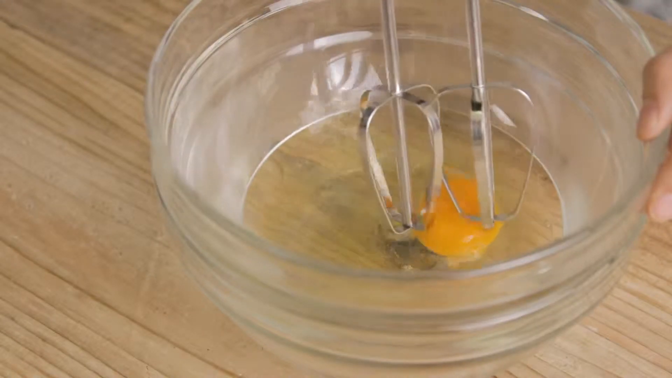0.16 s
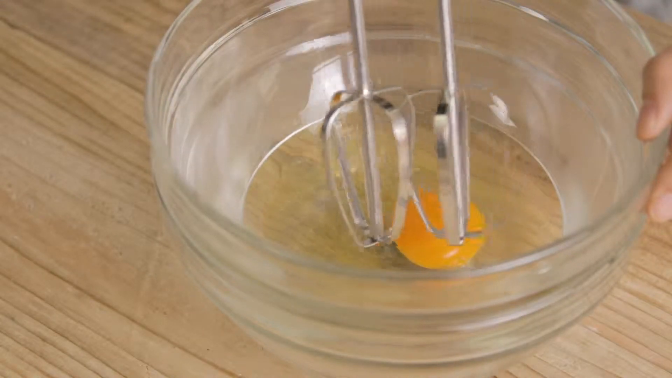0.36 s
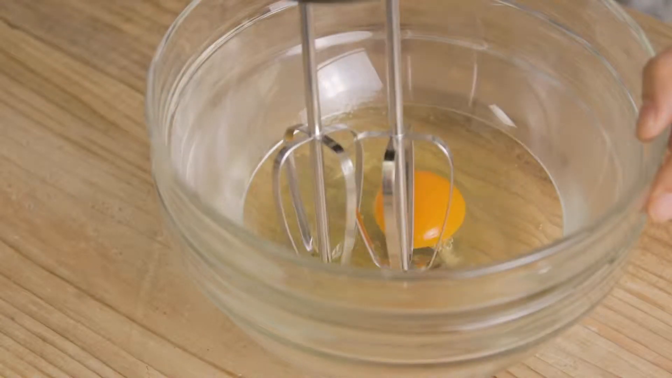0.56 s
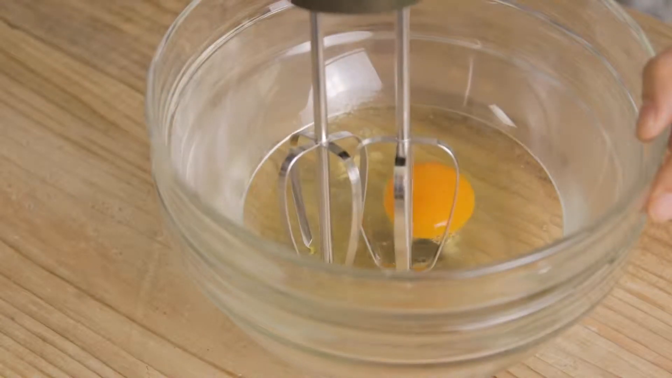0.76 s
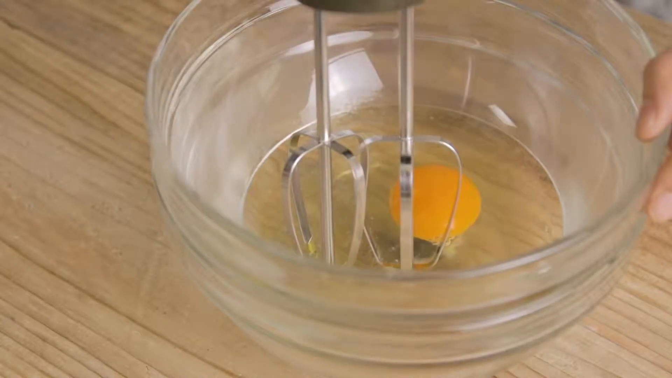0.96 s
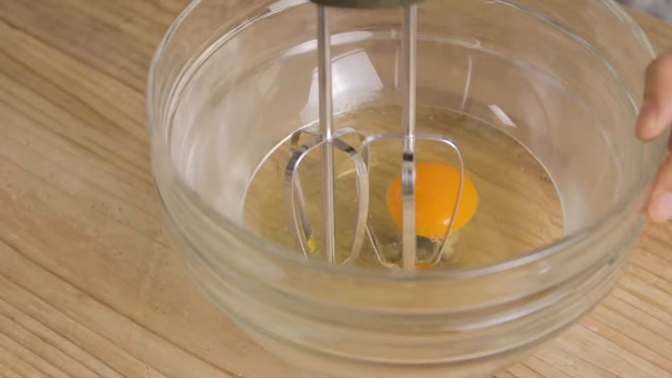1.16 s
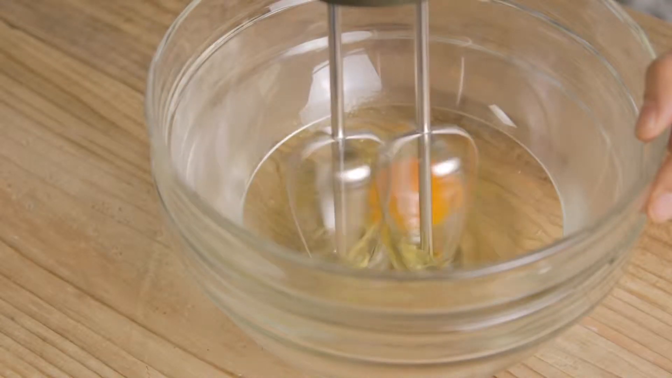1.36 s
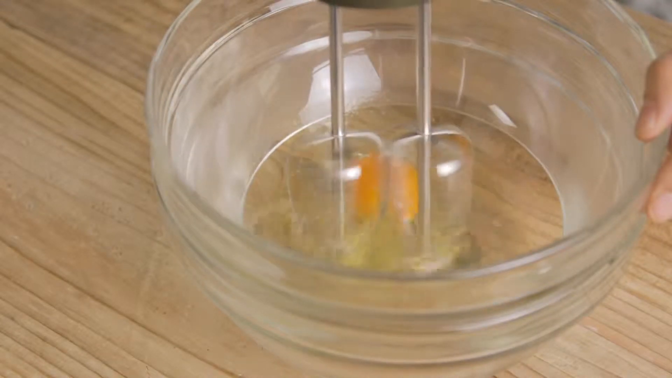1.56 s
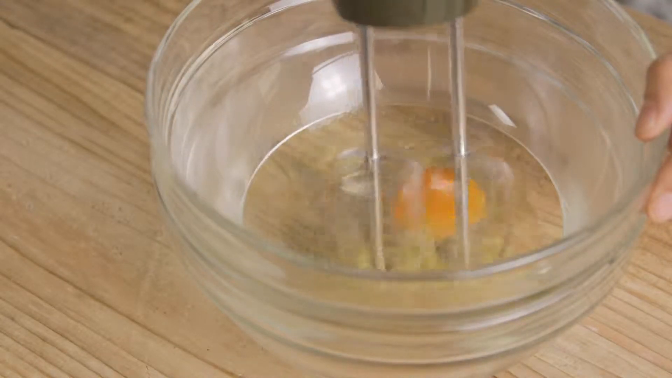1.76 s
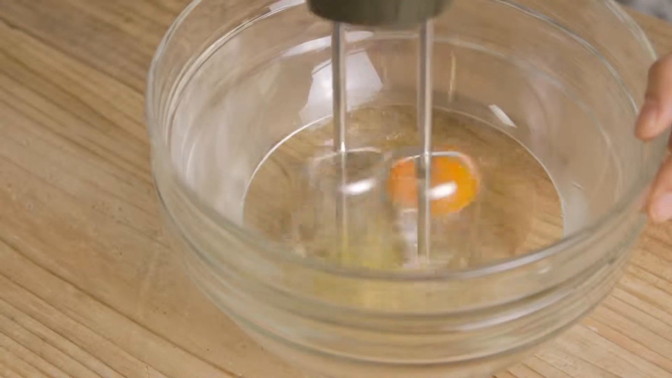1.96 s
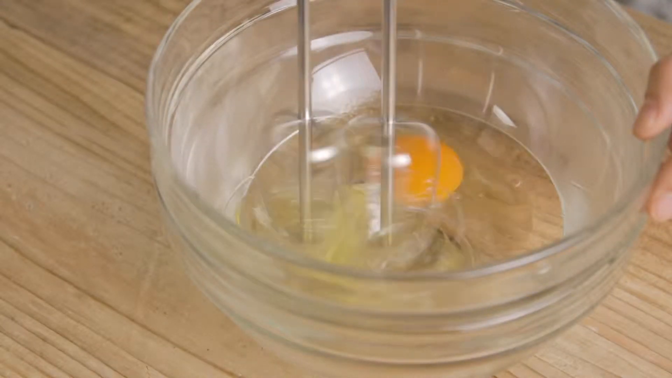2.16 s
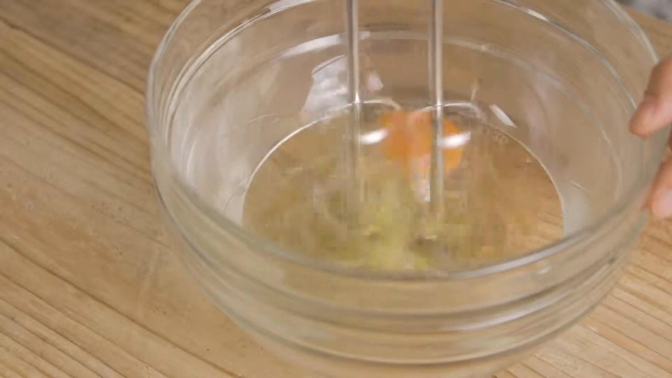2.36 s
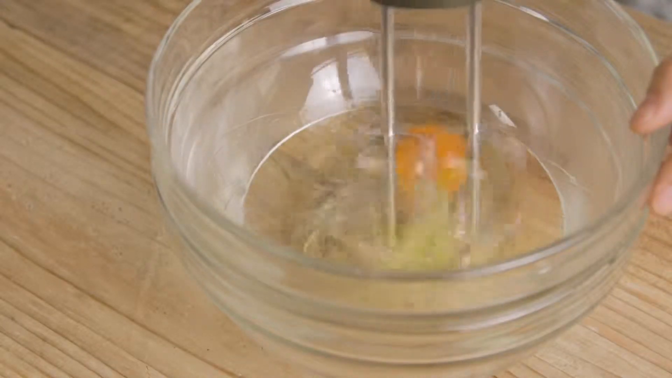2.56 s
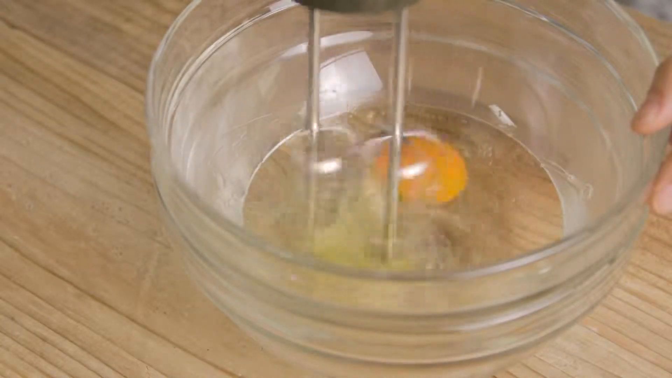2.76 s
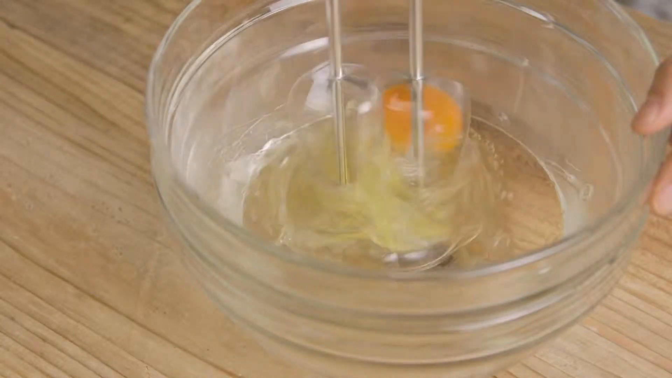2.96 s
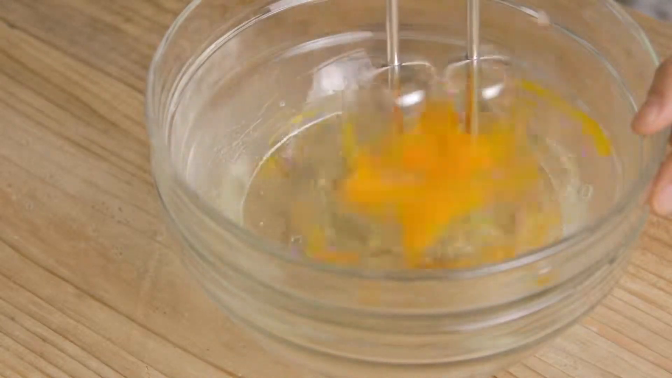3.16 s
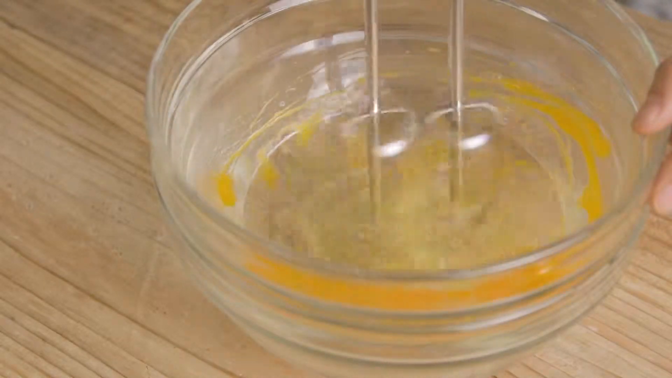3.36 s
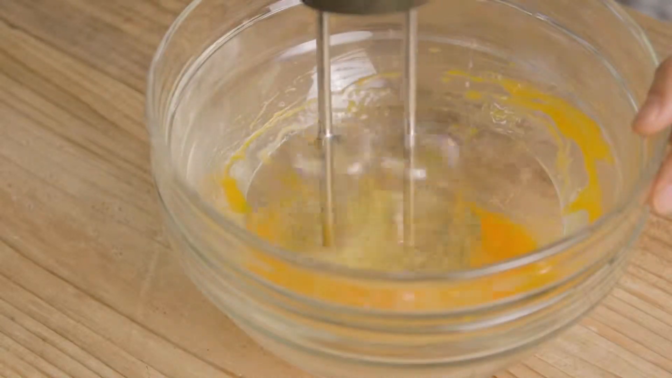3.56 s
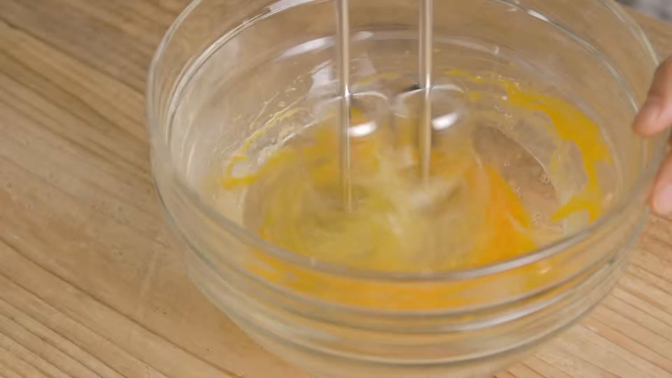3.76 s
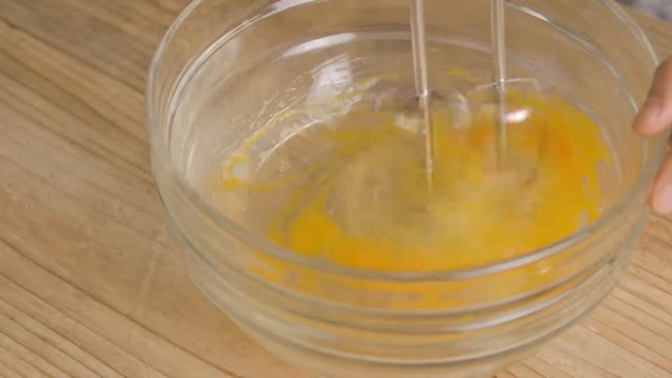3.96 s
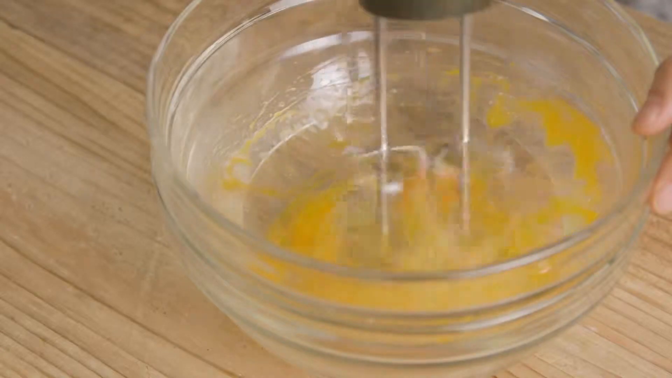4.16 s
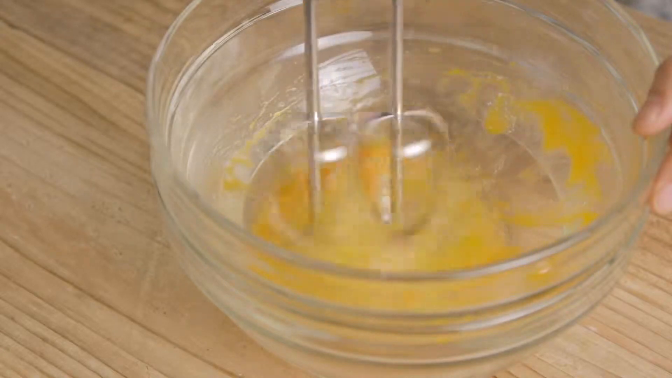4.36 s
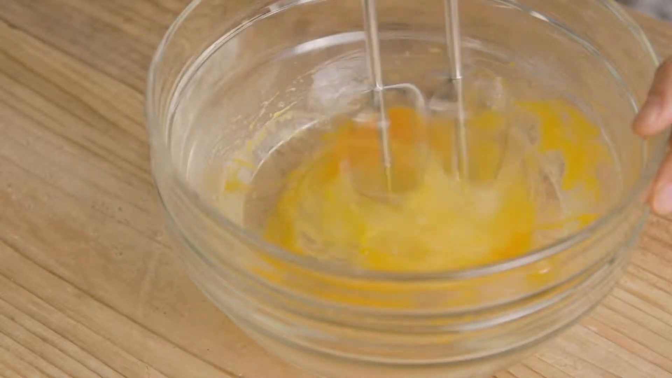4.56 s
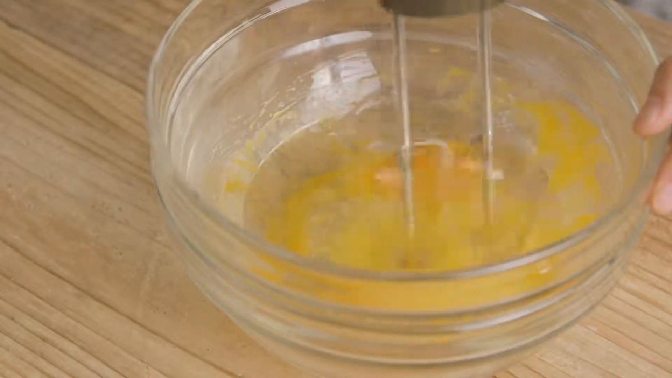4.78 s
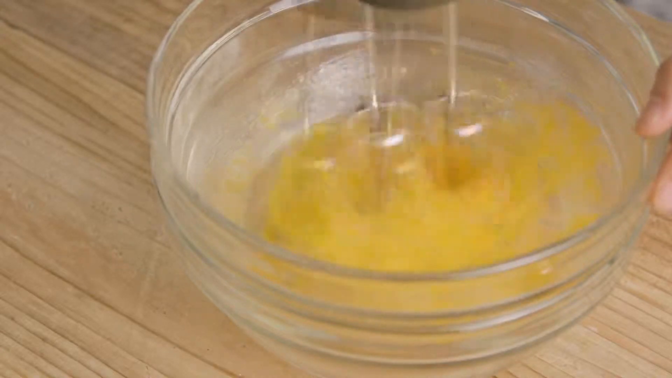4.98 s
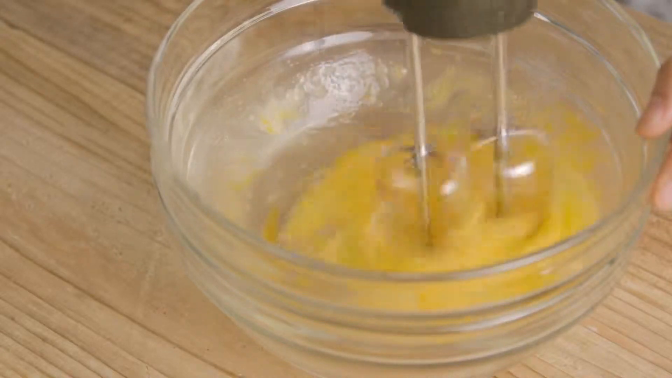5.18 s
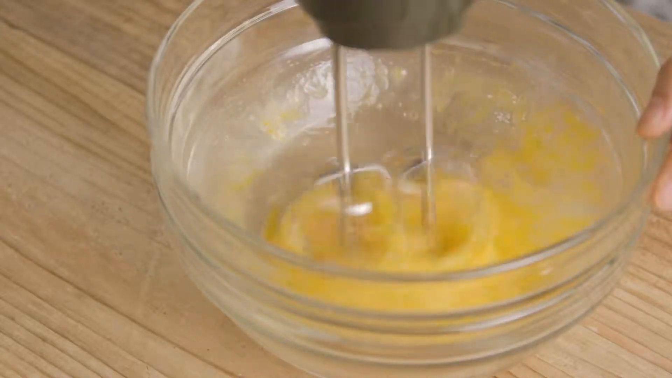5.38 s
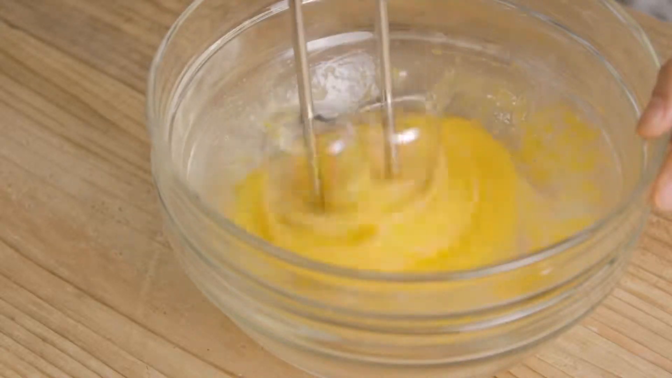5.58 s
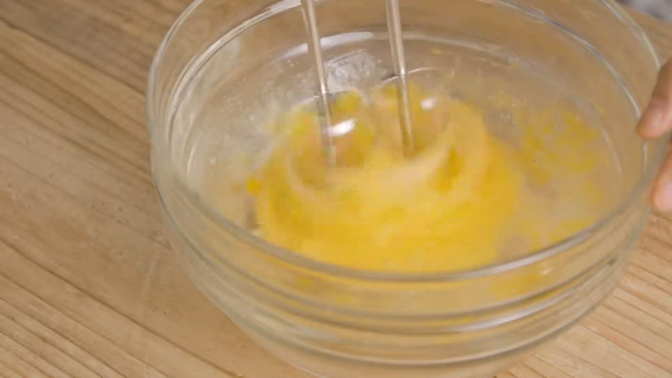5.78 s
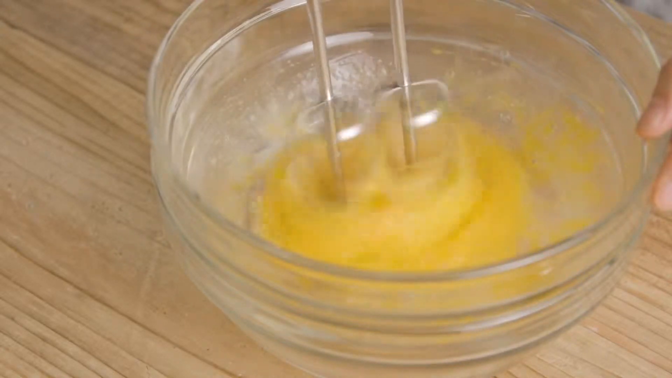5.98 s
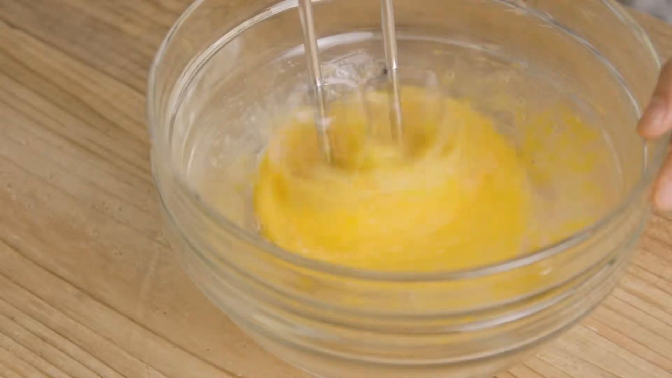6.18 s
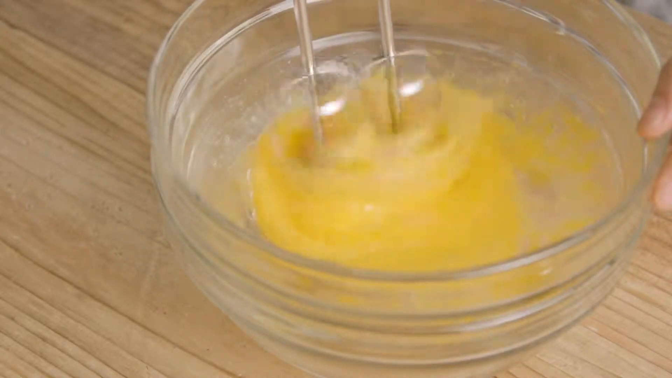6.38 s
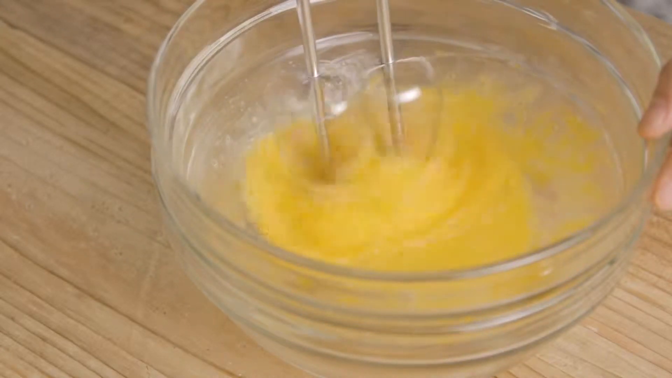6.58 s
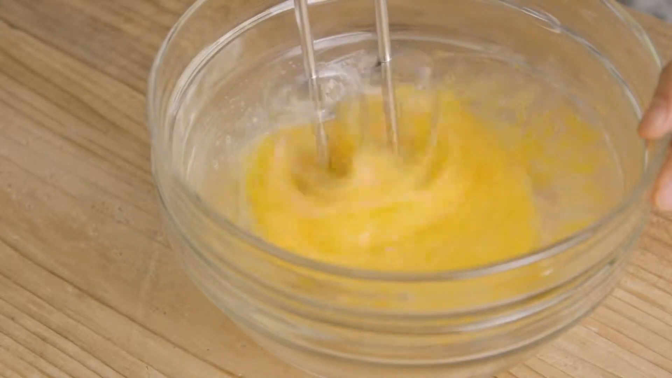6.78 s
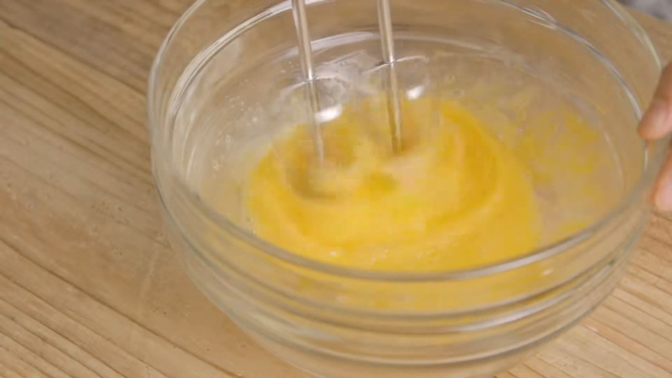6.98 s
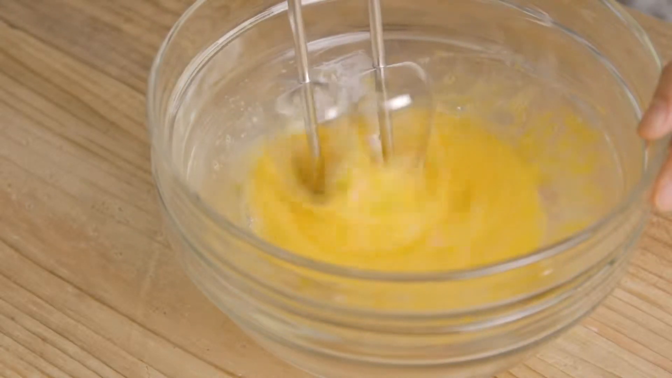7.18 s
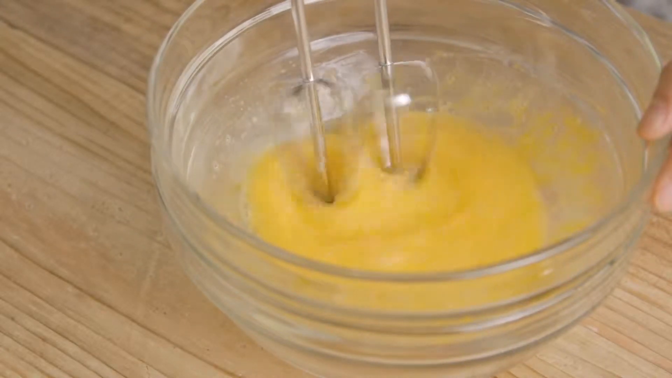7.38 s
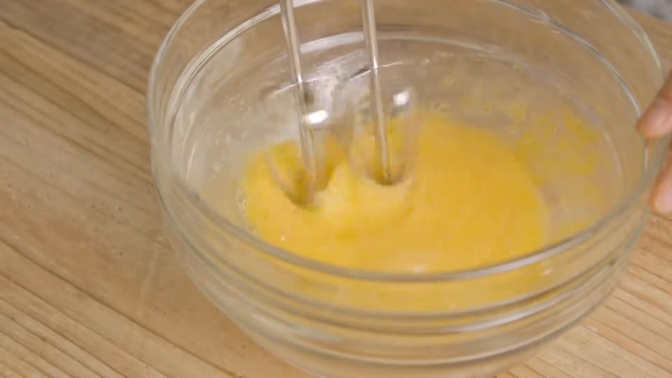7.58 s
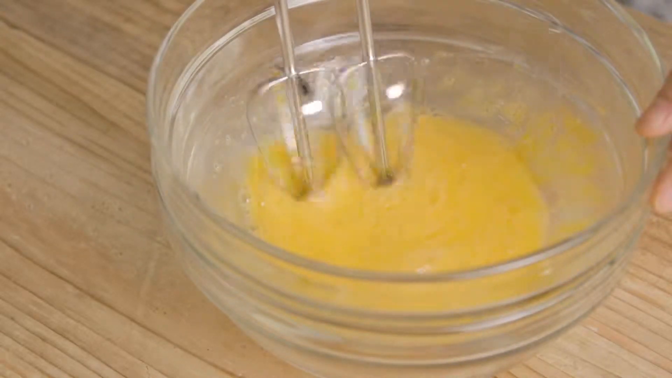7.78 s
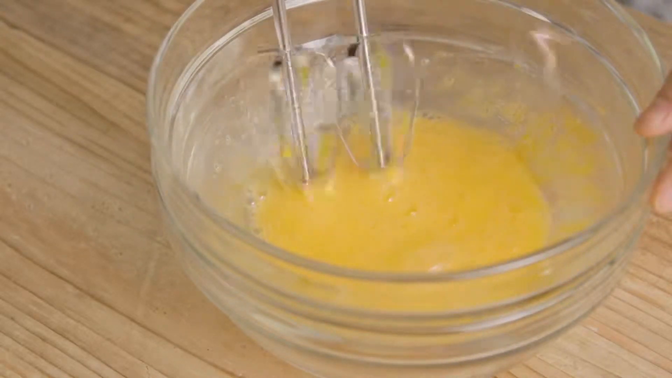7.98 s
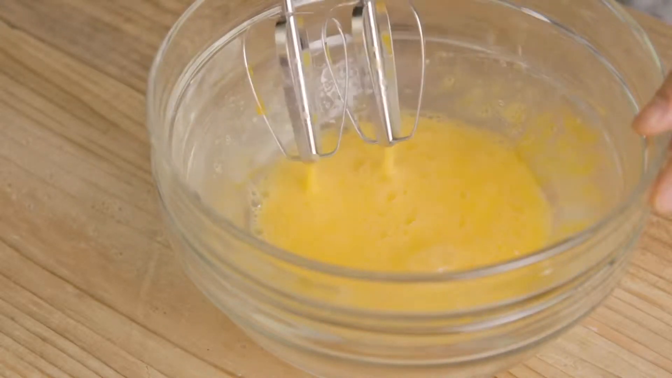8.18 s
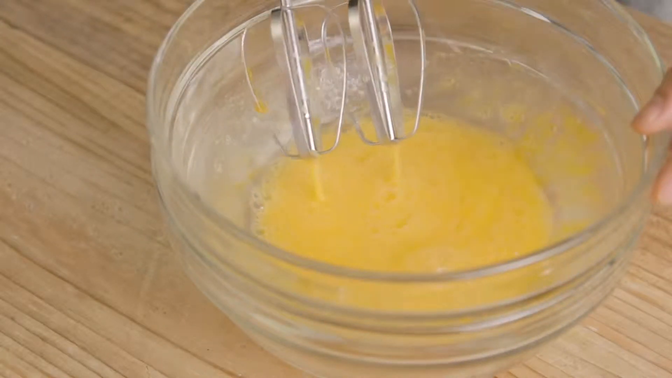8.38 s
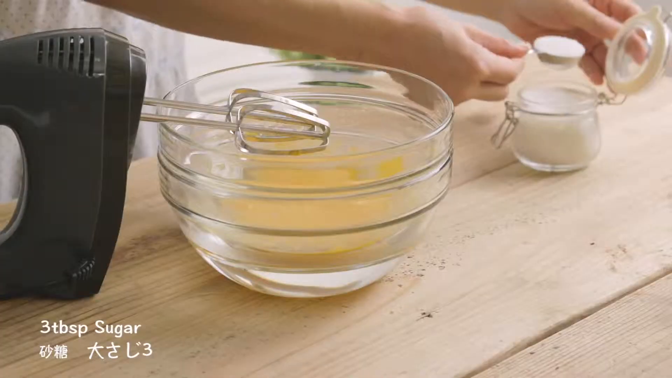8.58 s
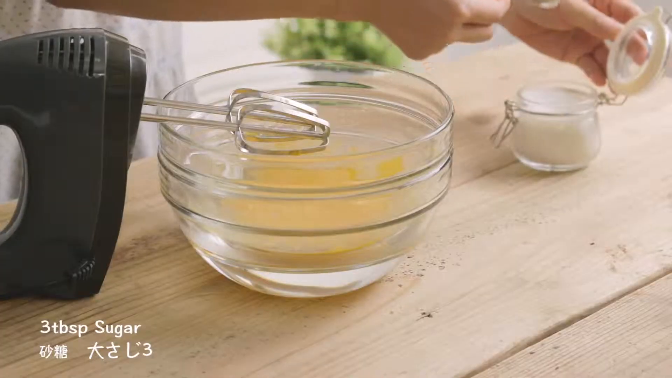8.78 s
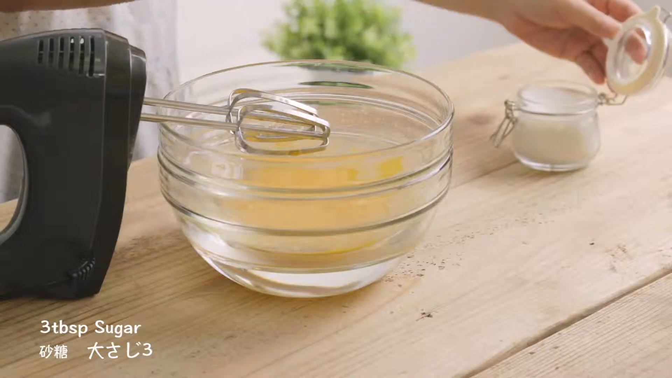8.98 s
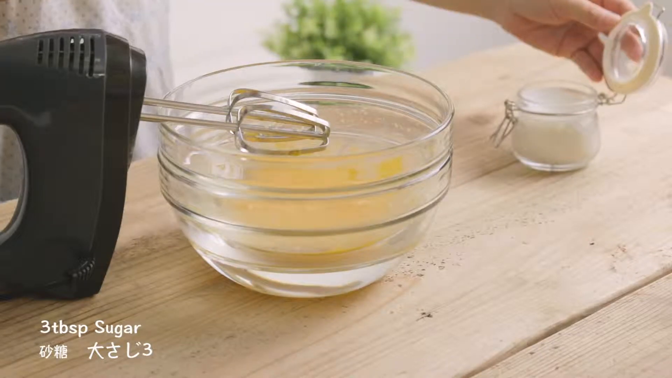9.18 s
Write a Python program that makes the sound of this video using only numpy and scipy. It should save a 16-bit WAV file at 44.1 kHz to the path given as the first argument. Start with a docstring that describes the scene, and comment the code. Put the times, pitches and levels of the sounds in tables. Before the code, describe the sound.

Close up, a hand mixer spins up with a buzzing whine, its steel beaters clinking on glass and whipping eggs, then clatters to a halt.

```python
"""First a faint click and a tap of steel on glass: an electric hand mixer in a bowl of eggs, on a
wooden kitchen table, close to one microphone. The switch snaps and the motor spins up, with fan
whine, commutator buzz and gear rattle in a plastic housing. The wires clink on the bowl and whip in
bubbles; as the eggs thicken, the beaters knock harder, once a turn. Switched off, the mixer clatters
to a stop, and a faint low rumble follows in the room."""
import sys
import numpy as np
from scipy import signal
from scipy.fft import rfft, irfft
from scipy.io import wavfile

SR = 44100
rng = np.random.default_rng(int(sys.argv[2]) if len(sys.argv) > 2 else 0)


def int16_out(signal):
    """Quantize to a 16-bit WAV file."""
    q = np.round(np.clip(np.atleast_2d(signal).T, -1, 1) * 32767)
    wavfile.write(sys.argv[1], SR, q.astype(np.int16))


N = 407484
T = np.arange(N) / SR
ON_S, OFF_S = 1.21, 7.066
FAN_BLADES, COMMUTATOR_SEGMENTS, GEAR_RATIO, MAINS_HZ = 9, 12, 10, 50

# The plastic housing, heard from close by. Each row: frequency in Hz, level in dB.
HOUSING_COLOUR = [(30, -37.5), (100, -28.5), (200, -13.5), (300, -7), (500, -2.5), (1000, -1), (1800, -1),
                  (3000, 2.5), (3800, -4), (5000, -6.5), (7300, -9.5), (10000, -11.5), (12000, -15.5),
                  (15500, -17.5)]
# Its resonances. Each row: centre in Hz, width in Hz, lift in dB.
HOUSING_MODES = [(702, 190, 9.2), (1209, 110, 9.9), (1455, 200, 5.3), (2035, 330, 5.4), (2350, 180, 4.4),
                 (2620, 150, 5.6), (3272, 320, 8.1), (4545, 490, 9.3), (5300, 200, 6.7), (5750, 390, 3.8),
                 (6510, 200, 4.8), (8650, 290, 7.1), (9800, 700, 1.9)]
# Hum of the unbalanced rotor. Each row: multiple of the shaft speed, level in dB.
SHAFT_TONES = [(1, -11), (2, -20), (3, -13.5), (6, -24), (7, -29), (18, -23), (35, -19), (38, -16)]
# That hum as the hand tilts the mixer. Each row: time in seconds, level in dB.
HUM_LEVEL = [(1.2, -4.5), (2.1, -9.5), (2.7, -1.5), (4, -3), (5.2, -2.5), (5.7, -4), (7.1, -9.5)]
# Fan whine as the mixer moves about near the microphone. Each row: time in seconds, level in dB.
WHINE_LEVEL = [(1.8, -44), (2.25, -40.5), (3.5, -44), (4.1, -45), (4.65, -42), (5.2, -47), (6.1, -42),
               (7.05, -43.5)]


def motor(turns, speed, current, drive_db=-30.5, torque_db=-10):
    """Gear teeth, rushing air, rotor and fan all reach the microphone through the housing."""
    pace = speed / speed.max()
    # torque pulses at twice the mains rate, and the gears chafe once a shaft turn
    ripple = 1 + .16 * (T < OFF_S) * np.cos(4 * np.pi * MAINS_HZ * T) + .25 * np.cos(2 * np.pi * turns)
    rattle = undb(-1.5) * impacts(9 * speed, spread_db=3) * ripple * undb(wander(50))
    air = undb(-3) * pace * rng.standard_normal(N)
    hum = sum(undb(db) * shaft_tone(turns, speed, order, flutter_db=2.1) for order, db in SHAFT_TONES)
    hum *= pace ** 6 * undb(curve(HUM_LEVEL) - 1.5)  # unbalance grows steeply with speed
    fan = shaft_tone(turns, speed, FAN_BLADES, flutter_db=1.22, wobble=.0065)
    fan *= undb(curve(WHINE_LEVEL)) * pace ** 2.1
    effort = undb(drive_db) * (pace ** 2.05 + undb(torque_db) * current)
    return through((rattle + air + hum) * effort + fan, body(HOUSING_COLOUR, HOUSING_MODES))


# Spin-up in a quick and a slow stage. Each row: share of the speed, time constant in seconds.
SPIN_UP_STAGES = [(.4, .16), (.6, .37)]
# The speed the motor settles to in the eggs. Each row: time in seconds, turns per second.
LOADED_SPEED = [(2.9, 365.3), (4, 364), (4.85, 365.5), (5.55, 363), (6.8, 367.5), (7.05, 370)]


def rotor(friction_hz_per_s=276, drag_s=6):
    """Shaft speed in turns per second, and the starting current, which dies away as the speed builds."""
    lag = sum(share * np.exp(-np.maximum(T - ON_S, 0) / tau) for share, tau in SPIN_UP_STAGES)
    driven = curve(LOADED_SPEED) * (1 - lag)
    # switched off, the rotor is braked by steady friction and a little air drag
    braked = 1 - np.exp(-np.maximum(T - OFF_S, 0) / drag_s)
    speed = np.maximum(driven - braked * (driven + friction_hz_per_s * drag_s), 0)
    current = lag * ramp(ON_S + .008, rise_s=.018)
    return speed * (1 + .0007 * wander(20)), current


def shaft_tone(turns, speed, order, flutter_db, wobble=.0044):
    """One multiple of the shaft speed; play in the bearings shakes its level and phase."""
    phase = order * (turns + wobble * wander(130))
    flutter = undb(flutter_db * wander(60))
    return np.sqrt(2) * np.sin(2 * np.pi * phase) * flutter * (order * speed < SR / 2)


# Brush whistle. Each row: multiple of the segment rate, level in dB, lift in dB when turning slowly.
COMMUTATOR_TONES = [(1, -13, -5), (2, -15, 5), (3, -3.5, -9), (4, -8, 3), (5, -10, 3), (6, -13, 1),
                    (7, -16, 0)]


def brushes(turns, speed, current, whistle_db=-35, start_lift_db=14, off_db=-8, ticking_db=-37):
    """Brushes whistle on the commutator; at low speed they tick in a comb of gliding overtones."""
    pace = speed / speed.max()
    slow = np.clip(3.5 * (1 - pace), 0, 1)
    level_db = whistle_db + start_lift_db * current + off_db * ramp(OFF_S, rise_s=.04) + 2.2 * wander(5)
    whistle = np.zeros(N)
    for k, db, lift_db in COMMUTATOR_TONES:
        tone = shaft_tone(turns, speed, COMMUTATOR_SEGMENTS * k, flutter_db=2.5, wobble=.006 / k)
        whistle += undb(db + slow * lift_db) * tone
    whistle *= pace ** 2.3 * undb(level_db)
    comb = sum(shaft_tone(turns, speed, COMMUTATOR_SEGMENTS * k, flutter_db=3.5, wobble=.0012)
               for k in range(3, 11))
    ticking = comb * undb(ticking_db) * pace ** 2.5 * (1 - pace) ** 2
    return through(whistle + ticking, body(HOUSING_COLOUR, HOUSING_MODES))


# The steel motor frame. Each row: frequency in Hz, level in dB.
FRAME_COLOUR = [(30, -39), (500, 5.5), (1100, 3.5), (2700, -4), (4000, -15), (7000, -19.5), (15500, -26)]
# Its resonances. Each row: centre in Hz, width in Hz, lift in dB.
FRAME_MODES = [(1204, 210, 17), (2640, 300, 20), (6300, 300, 20)]


def inrush(turns, speed, current, buzz_db=-23, spark_db=-22.5):
    """Starting current makes the brushes buzz and spark; the buzz flares at each frame resonance."""
    pace = speed / speed.max()
    buzz = sum(shaft_tone(turns, speed, COMMUTATOR_SEGMENTS * k, flutter_db=3, wobble=.02 / k)
               for k in (1, 2))
    buzz *= undb(buzz_db) * pace ** 1.5
    mains_pulse = np.sin(2 * np.pi * MAINS_HZ * T) ** 2
    sparks = undb(spark_db) * impacts(3500, spread_db=2) * mains_pulse * (1 - pace) ** 2
    return through((buzz + sparks) * current, body(FRAME_COLOUR, FRAME_MODES))


# The gear case. Each row: frequency in Hz, level in dB.
GEARCASE_COLOUR = [(30, -41), (400, -34), (700, -4), (1200, -7), (2500, -9.5), (4500, -8.5), (7000, -13),
                   (10000, -17), (15500, -19.5)]
# Its resonances. Each row: centre in Hz, width in Hz, lift in dB.
GEARCASE_MODES = [(680, 99, 8), (1192, 150, 12.15), (1470, 190, 6.8), (2070, 320, 16), (4420, 700, 5.5)]


def gears(turns, speed, current, rasp_db=-32.5, jerk_db=-25.5):
    """Slack teeth rasp in their case at low speed, hardest when the starting torque jerks them."""
    pace = speed / speed.max()
    teeth = impacts(45 * speed, spread_db=2) * (1 + .2 * np.cos(2 * np.pi * turns))
    level = undb(rasp_db) * pace ** 1.15 * (1 - pace) + undb(jerk_db) * current ** 3
    return through(teeth * level, body(GEARCASE_COLOUR, GEARCASE_MODES))


# The loose beater shafts. Each row: frequency in Hz, level in dB.
BEATER_COLOUR = [(30, -30.5), (120, -14), (300, -20), (550, -1.5), (1000, -4), (1700, -4.5), (3000, -1),
                 (5000, -9), (6200, -8), (9500, -16.5), (12000, -21), (15500, -26)]
# Their resonances. Each row: centre in Hz, width in Hz, lift in dB.
BEATER_MODES = [(709.6, 194, 16.3), (1311, 140, 17.2), (2160, 98, 7.6), (2820, 110, 7.1), (3400, 300, 4.5),
                (3980, 92, 9.7), (4394, 580, 9.8), (5320, 140, 4.7), (7110, 470, 8), (8350, 200, 13),
                (10480, 570, 16)]
# Their knocking, harder as the eggs thicken. Each row: time in seconds, level in dB.
KNOCK_LEVEL = [(1.3, -29), (2.2, -36), (4.35, -33.5), (4.8, -21.5), (5.05, -33), (5.25, -24), (5.6, -24.5),
               (6.1, -24), (7.1, -23)]


def beaters(turns, speed, chatter_s=.0056, limp_db=3, knock_phase=.66, min_shaft_hz=138):
    """The shafts knock in their sockets once a beater turn, each time a short chatter of steel."""
    pace = speed / speed.max()
    beater_turn = np.floor((turns - np.interp(OFF_S, T, turns)) / GEAR_RATIO - knock_phase)
    starts = np.flatnonzero((np.diff(beater_turn) > 0) & (speed[1:] > min_shaft_hz))
    # coasting freely, the beaters limp: every other knock is harder
    limp = limp_db * ramp(OFF_S, rise_s=.152) * np.cos(np.pi * beater_turn)
    strength = undb(curve(KNOCK_LEVEL) + limp) * pace ** .71
    age = np.arange(SR // 20) / SR / chatter_s
    pulse = age * np.exp((1 - age ** 2) / 2)
    force = np.zeros(N)
    # the drag of the egg makes each knock a little early or late, strong or weak
    for i, (late, size) in zip(starts, rng.standard_normal((len(starts), 2))):
        add(force, T[i] + .001 * late, strength[i] * undb(1.2 * size) * pulse)
    return through(force * impacts(9000, spread_db=1), body(BEATER_COLOUR, BEATER_MODES))


# Wires strike the bowl, close to the microphone.
# Each row: start in seconds, level in dB, treble tilt in dB.
BOWL_STRIKES = [(0.659, -25, -2.5), (1.352, -27, 4), (1.372, -25, 3), (1.427, -22, -8),
                (1.469, -22.5, -10.5), (1.554, -20, -11.5), (1.632, -25, -10.5), (1.857, -18, -2.5),
                (1.948, -25.5, -8), (2.349, -24, 3.5), (2.515, -21, -1), (2.578, -23.5, 4.5),
                (2.707, -22, -4), (3.207, -22, 12), (3.533, -23, -1.5), (3.705, -24.5, -0.5),
                (3.999, -20, 12), (4.027, -19.5, 2.5), (4.364, -23.5, -9), (4.68, -21.5, 4),
                (5.2, -18.5, -1), (6.407, -22.5, 8)]
# Steel scraping on glass. Each row: frequency in Hz, level in dB.
SCRAPE_COLOUR = [(30, -44), (120, -35), (350, -23), (600, -8), (1700, -8), (3000, -4), (5000, -6),
                 (6500, -12), (8300, -5), (11000, -12), (15500, -20)]
# Glass and steel ringing together. Each row: frequency in Hz, level in dB, seconds to fall by 60 dB.
BOWL_MODES = [(598, -6, .11), (743, -12, .09), (1240, -7, .13), (1389, -14, .16), (2266, -17, .17),
              (2756, -2, .24), (2900, -6, .18), (3350, -18, .13), (3800, -12, .19), (4400, -18, .12),
              (4924, -12, .23), (5080, -10, .16), (5900, -19, .18), (6831, -20, .18), (7612, -20, .15),
              (8140, -9, .17), (8400, -8, .09), (9100, -20, .11), (10220, -13, .11), (10700, -17, .11),
              (11400, -22, .08), (15100, -23, .06)]


def bowl(scrape_s=.024, scrape_db=-2, ring_db=-6.5, wet_damping=.41, contact_s=.00094, loops=4):
    """Wire glances off the glass: a brief scrape, then a ring that the whirling egg shortens."""
    out = np.zeros(N)
    contact = body(SCRAPE_COLOUR, [(hz, 160, 9) for hz, _, _ in BOWL_MODES])
    for start, db, treble_db in BOWL_STRIKES:
        damping = wet_damping if start > ON_S else 1
        t, envelope = fade(scrape_s)
        scrape = 4 * np.sqrt(t / scrape_s) * envelope * rng.standard_normal(len(t))
        add(out, start, undb(db + scrape_db) * signal.fftconvolve(scrape, contact))
        for hz, mode_db, t60 in BOWL_MODES:
            t, envelope = fade(t60 * damping)
            gain = undb(db + ring_db + mode_db + treble_db * tilt(hz))
            attack = 1 - np.exp(-(t / contact_s) ** 2)
            # the wire loops are nearly alike, so their modes beat against each other
            cluster_hz = hz + 45 * np.sqrt(hz / 3000) * rng.standard_normal((loops, 1))
            ring = np.sin(2 * np.pi * (cluster_hz * t + rng.random((loops, 1)))).sum(0) / np.sqrt(loops)
            add(out, start, gain * attack * envelope * ring)
    return out


def skitter(current, level_db=-36, per_s=300, treble_db=4, t60=.052):
    """Jerked into motion, the wires skitter lightly over the glass and keep it ringing."""
    t, envelope = fade(t60)
    ring = envelope * sum(undb(db + treble_db * tilt(hz)) * np.sin(2 * np.pi * (hz * t + rng.random()))
                          for hz, db, _ in BOWL_MODES)
    taps = impacts(per_s, spread_db=6.5) * current * undb(level_db)
    return through(taps, ring / np.linalg.norm(ring))


# Big air pockets gulped down in the bowl.
# Each row: start in seconds, level in dB, pitch in Hz, seconds to fall by 60 dB.
AIR_GULPS = [(1.753, -9.5, 1464, 0.019), (5.753, -15.5, 2860, 0.046)]


def eggs(count=900, quietest_db=-38, ring_cycles=16):
    """The beaters whip small air pockets into the eggs, now and then a big one."""
    out = np.zeros(N)
    for when, pitch, loudness in rng.random((count, 3)):
        hz = 280 * 16 ** pitch
        add(out, 1.5 + 5.1 * when, undb(quietest_db + 10 * loudness ** 2) * bubble(hz, ring_cycles / hz))
    for start, db, hz, t60 in AIR_GULPS:
        add(out, start, undb(db) * bubble(hz, t60))
    return out


def bubble(hz, t60, glide=.024):
    """A pocket of air rings, rising a little in pitch."""
    t, envelope = fade(t60)
    attack = 1 - np.exp(-t * hz / 2)
    return attack * envelope * np.sin(2 * np.pi * hz * t * (1 + glide * t / t60))


# The slide switch on the mixer.
# Each row: start in seconds, level in dB, resonance in Hz, seconds to fall by 60 dB.
SWITCH_SNAPS = [(0.559, -44, 2260, 0.044), (1.2144, -22.5, 3700, 0.011)]


def switch():
    """Dry snaps of the plastic slider."""
    out = np.zeros(N)
    plastic_colour = [(100, -32.5), (700, -16), (1200, 11), (4500, .5), (7000, -10), (15000, -28.5)]
    for start, db, hz, t60 in SWITCH_SNAPS:
        t, envelope = fade(t60)
        snap = envelope * rng.standard_normal(len(t))
        add(out, start, undb(db) * signal.fftconvolve(snap, body(plastic_colour, [(hz, 1200, 5)])))
    return out


def kitchen(direct, t60=.35, wet_db=-13, delay_s=.006):
    """This close, the direct sound leads; the walls return a short, slightly duller tail."""
    t, envelope = fade(t60)
    reflections = envelope * rng.standard_normal(len(t)) * (t > delay_s)
    tail = signal.sosfilt(signal.butter(1, 7000, fs=SR, output="sos"), reflections)
    return direct + undb(wet_db) * through(direct, tail / np.linalg.norm(tail))


# The quiet kitchen at the microphone. Each row: frequency in Hz, level in dB.
ROOM_COLOUR = [(25, -28.5), (60, -9), (110, -3.5), (250, -2.5), (400, -12), (700, -18.5), (1700, -23.5),
               (3000, -29.5), (8000, -41), (15000, -45.5)]
# The low rumble after the mixer stops. Each row: frequency in Hz, level in dB.
RUMBLE_COLOUR = [(18, -57), (30, -35), (107, -6), (148, -8), (397, -27.5), (530, -27), (561, -29),
                 (2000, -50), (3000, -58.5), (3900, -87), (6600, -120)]
# Dull booms in the background. Each row: midpoint in seconds, level in dB, pitch in Hz, length in seconds.
LOW_BOOMS = [(0.685, -65.5, 55, .07), (1.452, -58, 93, .18), (4.577, -61, 106, .15),
             (4.853, -53, 110, 0.18), (8.6, -61.5, 152.3, 0.27), (8.942, -57, 103.2, 0.34),
             (8.97, -54.5, 139.6, .2), (9.131, -54, 101.3, 0.18)]


def background(room_db=-70.5, rumble_db=-65, rumble_start_s=8.48, swell_at_s=8.98, swell_db=3.5):
    """Behind the mixer: room tone, a few soft booms and a late rumble that swells once."""
    out = undb(room_db) * through(rng.standard_normal(N), body(ROOM_COLOUR))
    swell = np.exp(-((T - swell_at_s) / .13) ** 2)
    rumble = through(rng.standard_normal(N), body(RUMBLE_COLOUR))
    out += ramp(rumble_start_s, rise_s=.01) * undb(rumble_db + swell_db * swell) * rumble
    for middle, db, hz, length in LOW_BOOMS:
        t = np.arange(int(length * SR)) / SR
        boom = np.sin(np.pi * t / length) * np.sin(2 * np.pi * hz * t)
        add(out, middle - length / 2, undb(db + 2) * boom)
    return out


def body(colour, modes=(), size=4096):
    """Causal impulse response of unit energy: a broad colour lifted by resonances."""
    f = np.arange(size // 2 + 1) * SR / size + 1
    hz, db = np.transpose(colour)
    broad_db = np.interp(np.log(f), np.log(hz), db)
    resonant_db = sum(lift / (1 + (2 * (f - centre) / width) ** 2) for centre, width, lift in modes)
    cepstrum = irfft(np.log(undb(broad_db + resonant_db)))
    response = irfft(np.exp(rfft(2 * cepstrum[:size // 2], size)))  # minimum phase
    return response / np.linalg.norm(response)


def impacts(per_s, spread_db):
    """Random tiny impacts of uneven size."""
    hits = (rng.random(N) < per_s / SR) * rng.choice([-1, 1], N)
    return unit(hits * undb(spread_db * rng.standard_normal(N)))


def wander(hz):
    """Smooth random drift with a spread near 1."""
    return unit(signal.resample(rng.standard_normal(int(hz * N / SR) + 2), N))


def fade(t60):
    """Time axis and envelope of a ring that dies by 60 dB."""
    t = np.arange(int(t60 * SR)) / SR
    return t, np.exp(-np.log(1000) * t / t60)


def tilt(hz):
    """Octaves above 4 kHz, limited to one either way."""
    return np.clip(np.log2(hz / 4000), -1, 1)


def ramp(start_s, rise_s):
    """A straight rise from 0 to 1."""
    return np.clip((T - start_s) / rise_s, 0, 1)


def curve(rows):
    """Rows of time and value, joined by straight lines."""
    return np.interp(T, *np.transpose(rows))


def through(x, response):
    """Pass a sound through an impulse response."""
    return signal.oaconvolve(x, response)[:N]


def add(track, start_s, sound):
    """Mix a sound into the track."""
    start = int(start_s * SR)
    track[start:start + len(sound)] += sound[:N - start]


def unit(x):
    """Scale to an rms of 1."""
    return x / np.sqrt(np.mean(x ** 2))


def undb(db):
    """Decibels to gain."""
    return 10 ** (np.asarray(db) / 20)


def scene():
    """At the table, in mono: one shaft drives the motor's sounds and, geared down, the beaters."""
    speed, current = rotor()
    turns = np.cumsum(speed) / SR
    mixer = motor(turns, speed, current) + inrush(turns, speed, current)
    mixer += brushes(turns, speed, current) + gears(turns, speed, current)
    direct = mixer + beaters(turns, speed) + switch() + bowl() + skitter(current) + eggs()
    return (kitchen(direct) + background())[None]


def record(dry, top_hz=15700):
    """The recorder cuts the top of the microphone's signal."""
    return signal.sosfilt(signal.ellip(10, .2, 70, top_hz, fs=SR, output="sos"), dry)


dry = scene()
out = record(dry)
int16_out(out)
```